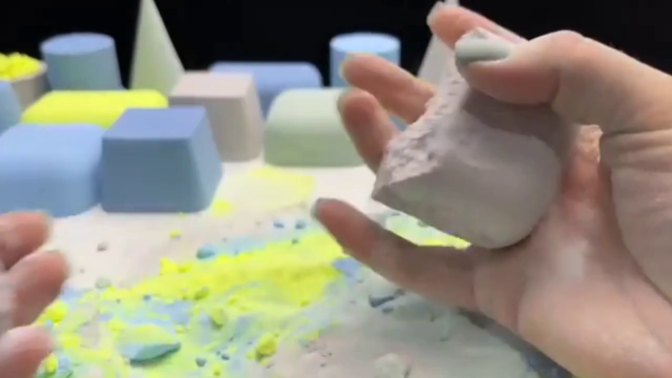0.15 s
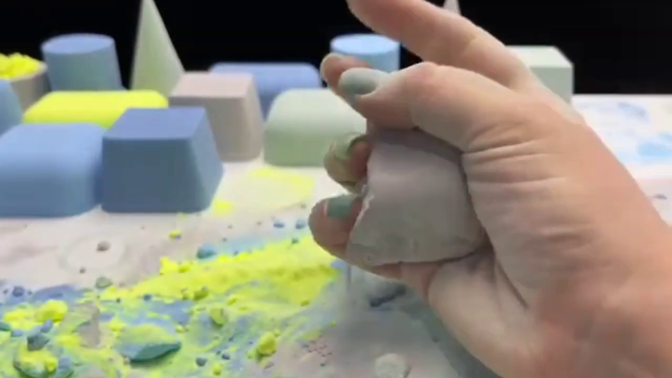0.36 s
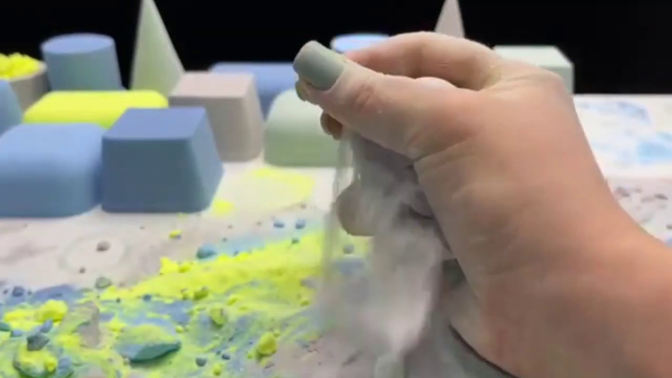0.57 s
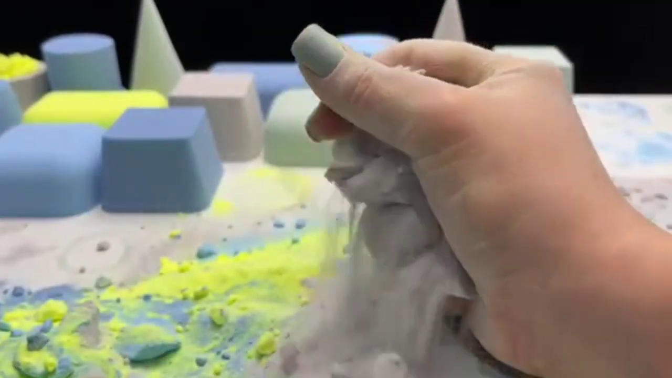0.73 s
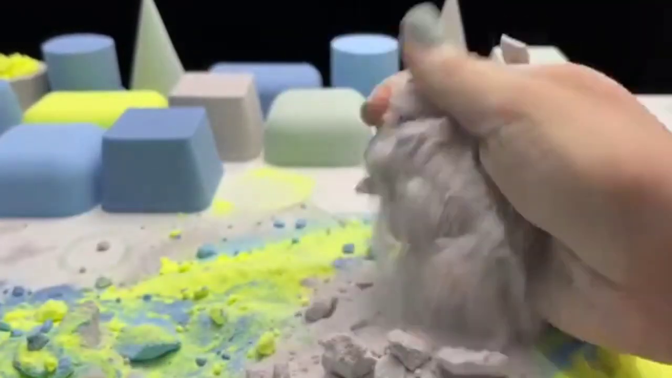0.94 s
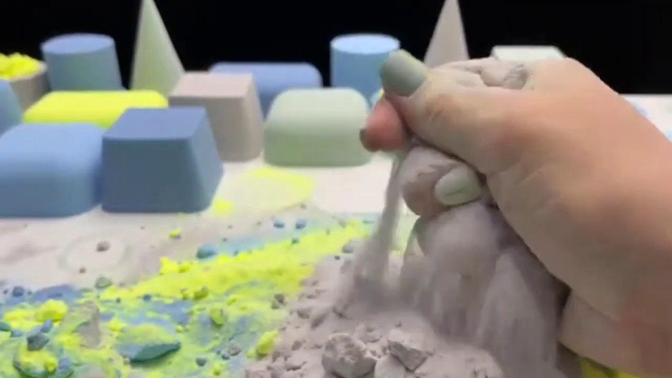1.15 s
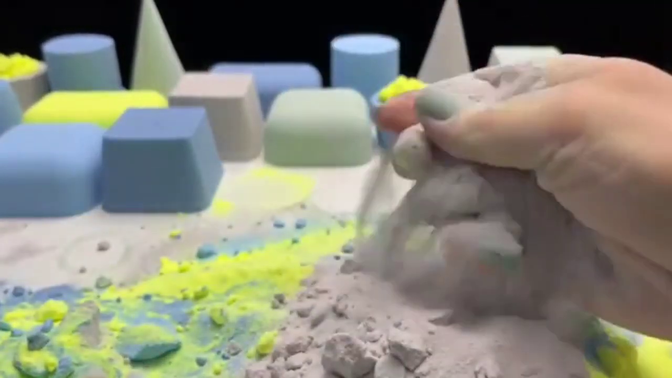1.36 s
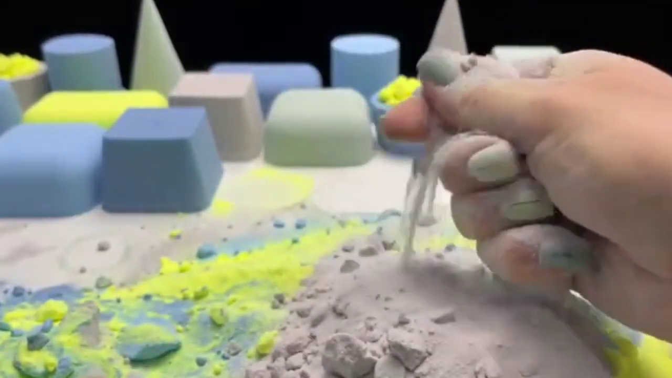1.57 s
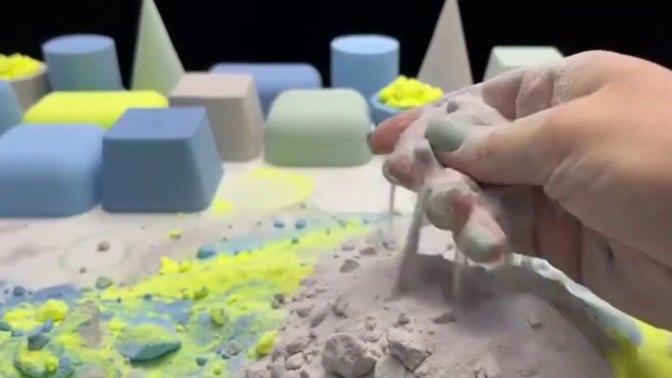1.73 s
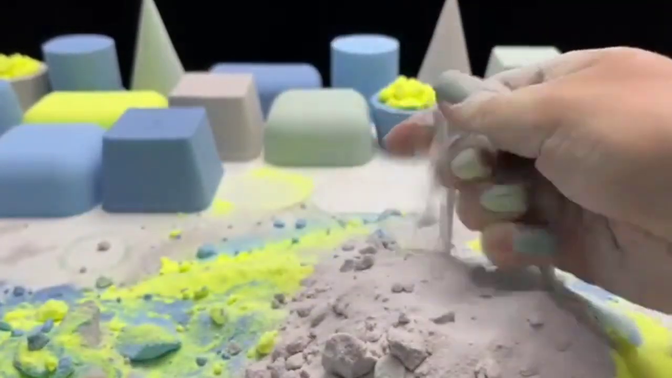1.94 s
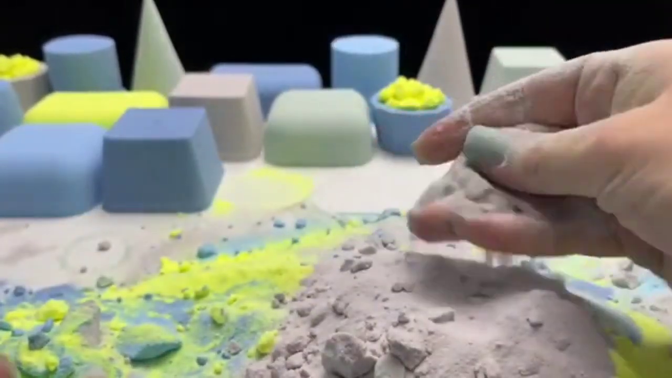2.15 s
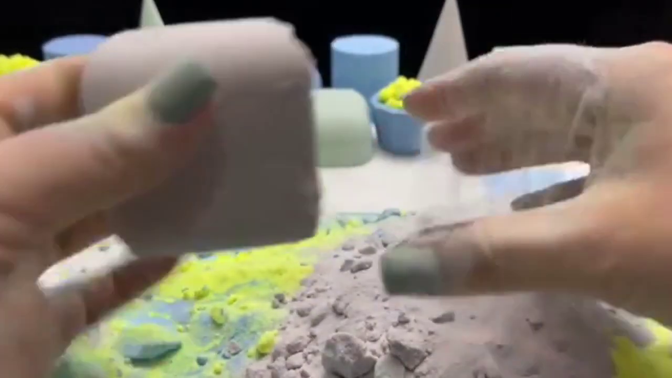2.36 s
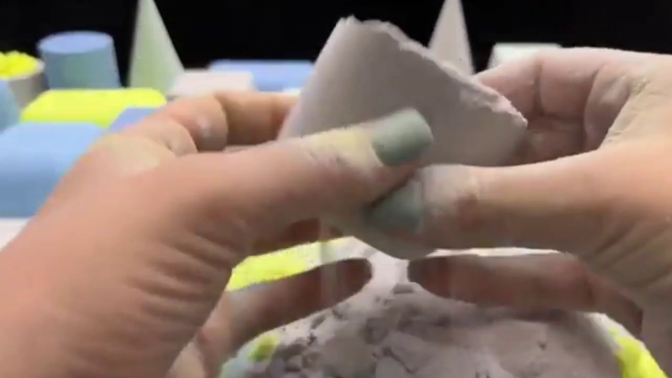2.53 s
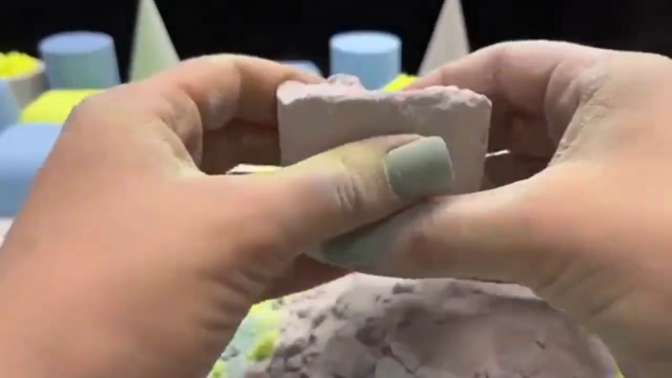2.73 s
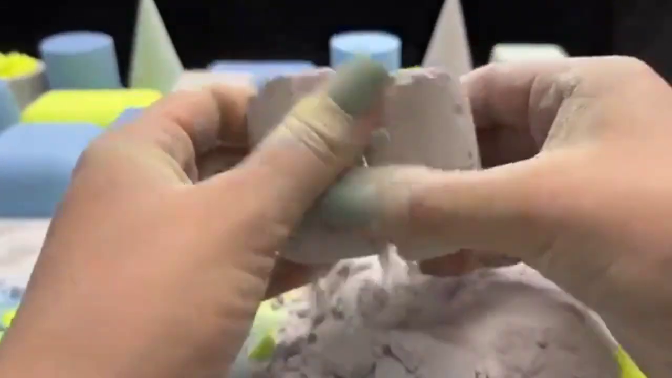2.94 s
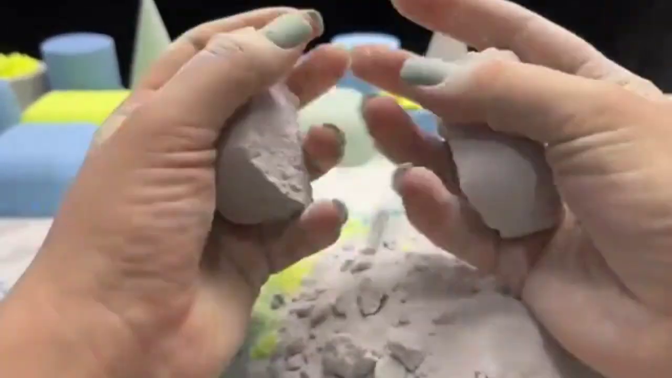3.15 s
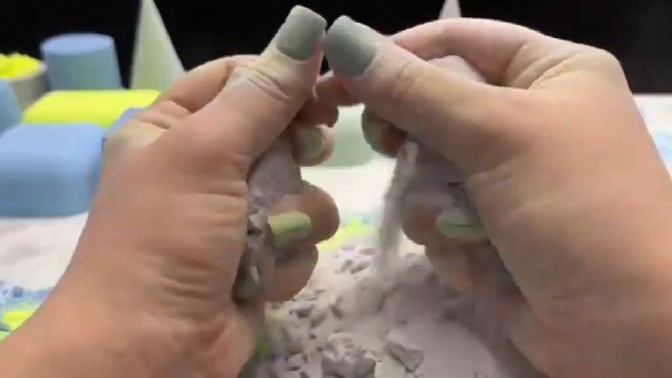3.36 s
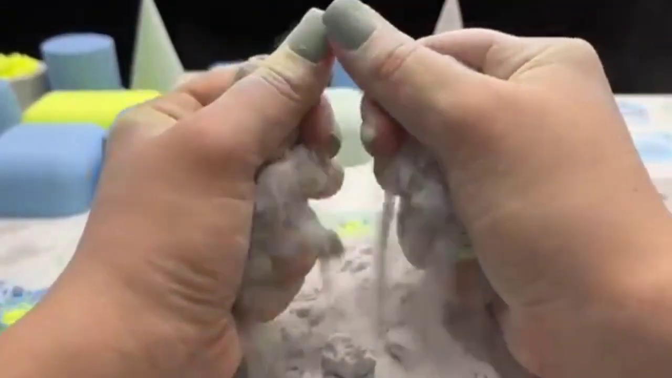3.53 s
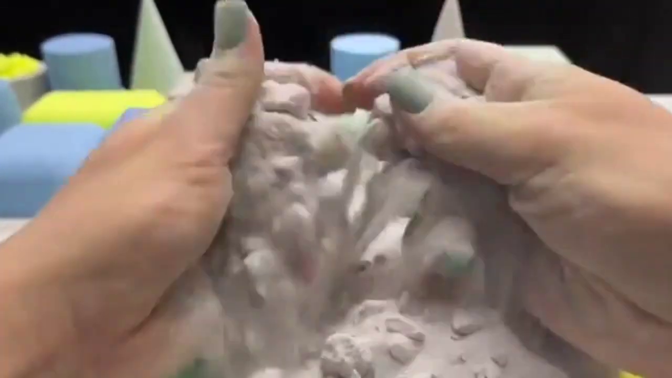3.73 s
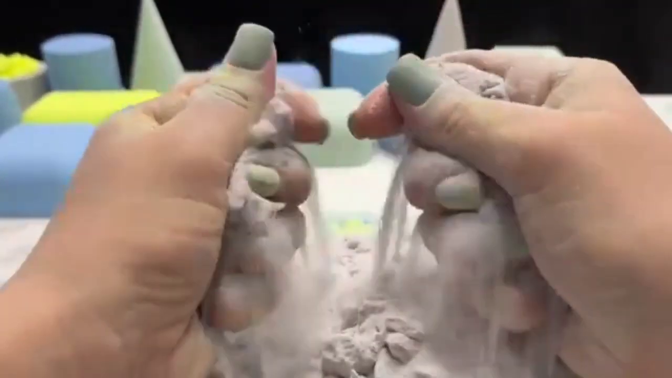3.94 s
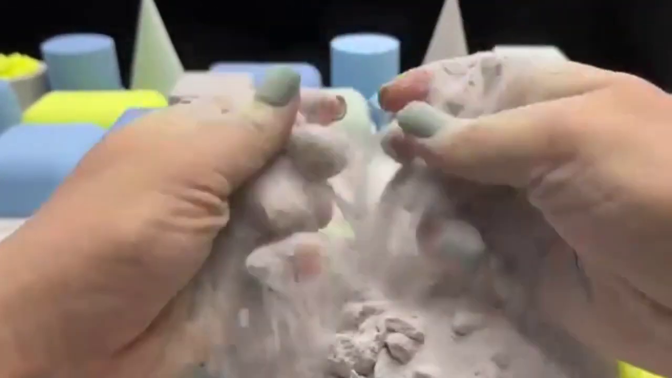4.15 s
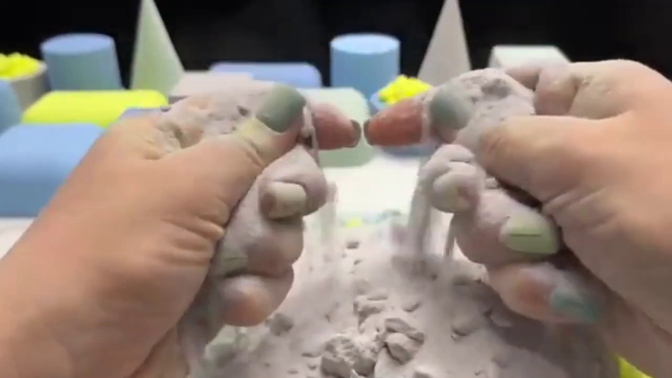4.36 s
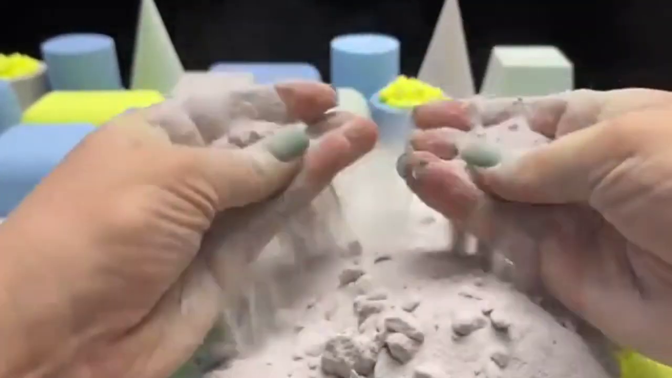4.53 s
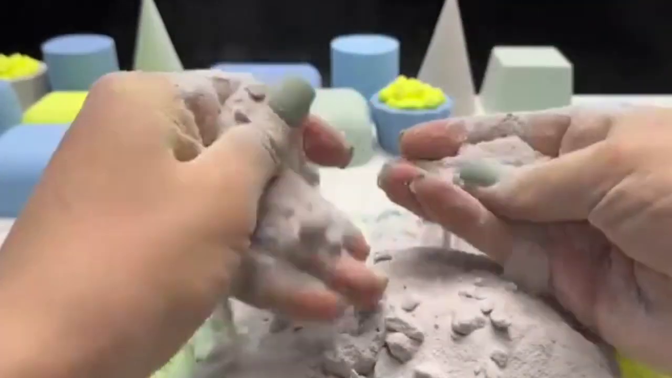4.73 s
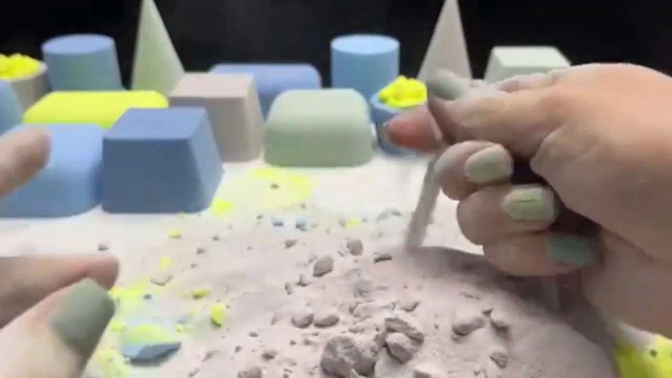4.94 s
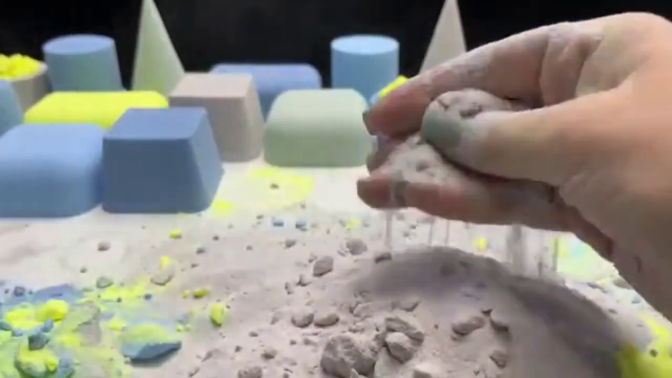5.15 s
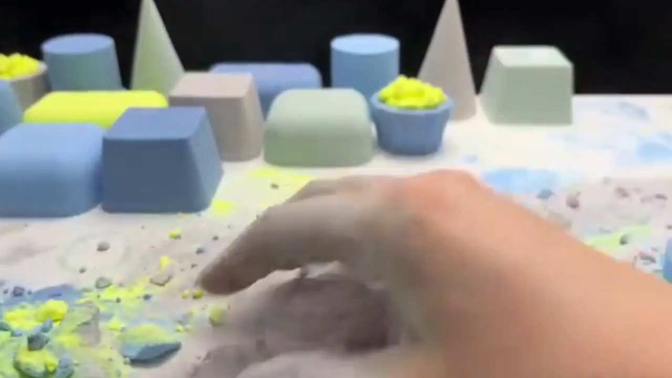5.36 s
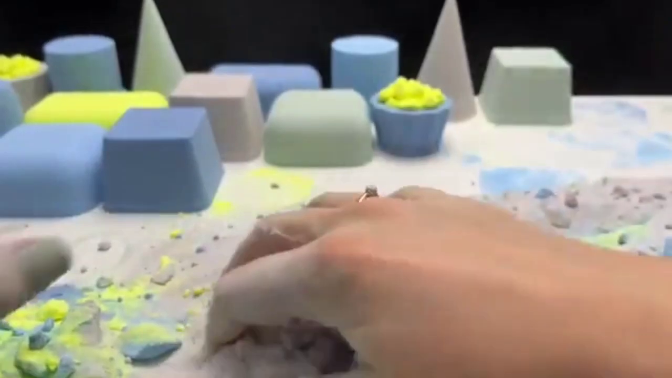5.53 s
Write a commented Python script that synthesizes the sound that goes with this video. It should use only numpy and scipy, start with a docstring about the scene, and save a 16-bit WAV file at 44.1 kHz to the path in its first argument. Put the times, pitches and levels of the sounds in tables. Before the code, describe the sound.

A close stereo microphone in a quiet room hears hands crushing pressed powder above a table. From 0 to 0.4 s, fine, dry hissing strokes rub the block. At about 0.45 s it breaks: a dense cluster of crunches, hollow knocks and dusty puffs, strongest from 0.5 to 0.85 s, with low table rumble. From 0.9 to 2.8 s it is softer, with sandy sifting, flickering finger rubs, and isolated ticks near 1.45, 1.8 and 2.2 s. A firm single crack lands at 2.86 s. Light rubbing leads to a second, longer crush from 3.3 to 4.3 s, full of rapid irregular snaps, crumbling and short thuds, peaking around 3.4 to 3.9 s. Smaller crumbles and gritty trickles follow until 5.3 s, with a small crunch near 4.9 s. From 5.45 s to the end at about 5.7 s, a palm slides over loose powder with a smooth, broad rushing rub.

```python
"""Hands crush blocks of pressed powder: lumps crack and thud as filtered impulses, with puffs of noisy dust,
and the table top carries each blow as a falling chirp. Squeezes crumble as streams of tiny impacts;
strokes rub with a dry, flickering hiss of dense grains, and last a palm slides over the heap.
Below lies a low rumble of the table and the quiet room. A two-port microphone close by hears it all."""
import sys
import numpy as np
from scipy import signal
from scipy.fft import rfft, irfft, next_fast_len
from scipy.io import wavfile
from scipy.ndimage import uniform_filter1d, map_coordinates

SR = 44100
rng = np.random.default_rng(int(sys.argv[2]) if len(sys.argv) > 2 else 0)


def digitize_waveform(pressure):
    """Quantize a signal to 16-bit integers and store it at the path in sys.argv[1].

    Rows of a 2-D input are taken as channels; values are limited to [-1, 1].
    """
    field = np.atleast_2d(pressure).T
    bounded = np.clip(field, -1, 1)
    quanta = np.round(bounded * 32767).astype(np.int16)
    wavfile.write(sys.argv[1], SR, quanta)


def voltage_ratio(decibels):
    """Convert decibels (scalar or array-like) to amplitude ratios, 20 dB per decade."""
    exponent = np.asarray(decibels, float) / 20
    return 10 ** exponent


N = 250929  # length in samples


def unit(x):
    """Normalisation: scale to rms 1."""
    return x / np.sqrt(np.mean(x ** 2) + 1e-20)


def along(points, hz):
    """Logarithmic pitch: columns of (Hz, value, ..) rows are interpolated on a log frequency axis."""
    f, *cols = np.transpose(points)
    return np.squeeze([np.interp(np.log(hz + 1), np.log(f + 1), c) for c in cols])


def curves(rows):
    """Linear envelopes: one value per sample for each column after the time."""
    s, *cols = np.transpose(rows)
    return [np.interp(np.arange(N) / SR, s, c) for c in cols]


def wobble(rate):
    """Slow modulation: a smooth random curve through rate knots a second."""
    return map_coordinates(rng.standard_normal(N // 20), [np.arange(N) * rate / SR])


def filtered(x, response):
    """Linear filtering: the spectrum of x times a complex response of frequency."""
    m = next_fast_len(N + SR // 2)
    return irfft(rfft(x, m) * response(np.fft.rfftfreq(m, 1 / SR)), m)[..., :N]


def grains(spectrum, rate, spread_db, smooth):
    """Shot noise: two unrelated streams of uneven tiny impacts over smooth noise, coloured, rms 1."""
    hit = rng.random(N) < rate / SR
    size = unit(hit * voltage_ratio(spread_db * np.minimum(rng.exponential(size=N), 3)))
    stream = (size + smooth) * rng.standard_normal((2, N))
    return unit(filtered(stream, lambda hz: voltage_ratio(along(spectrum, hz))))


def bursts(rows, rise_s, fall_s, arch_db, floor_db, extra=0):
    """Power addition: level in dB of tilted, arched bursts with quick edges, over a floor.

    Each row: start in seconds, length in seconds, level in dB, swell in dB, extra dB (weighted by extra).
    """
    edge_db = 4.5  # loss over one rise or fall time
    start, length, db, swell_db, extra_db = np.transpose(rows)[:, :, None]
    grid = np.arange(0, N + 64, 64)
    t = grid / SR - start
    u = np.clip(t / length, 0, 1) - .5  # -0.5 at the start, 0.5 at the end
    edges = np.maximum(1 - t / rise_s, 0) + np.maximum(1 - (length - t) / fall_s, 0)
    middle_db = db + extra * extra_db + swell_db * u - arch_db * (2 * u) ** 2
    gains = voltage_ratio(middle_db - edge_db * edges)
    level_db = 10 * np.log10(np.sum(gains ** 2, axis=0) + voltage_ratio(floor_db) ** 2)
    return np.interp(np.arange(N), grid, level_db)


# Stereo image of the two ports, by frequency, with flat stretches of opposite or equal phase.
# Each row: frequency in Hz, left phase lead in rad, likeness 0-1, left-right level in dB;
# lead and level are split by the weights of the two ports.
PORT_PAIR = [(60, 0, .91, -.7), (400, .16, .87, .1), (900, .6, .68, 1.6), (1300, .9, .1, 2.1),
             (1600, .4, 0.05, 1.1), (1850, .1, .93, .5), (2500, .5, .65, .6), (3400, .9, .45, 2.5),
             (4800, .05, .6, 2.5), (6400, -.9, .5, 2.2), (7300, -2.2, .65, .6), (7620, -np.pi, 1, 0),
             (8900, -np.pi, 1, 0), (9200, -4, .55, 0), (10600, -5.6, .6, 0), (11200, -2 * np.pi, 1, 0),
             (12800, -2 * np.pi, 1, 0), (13200, -7, .55, 0), (14300, -8.5, .6, 0),
             (14600, -3 * np.pi, 1, 0)]


def ports(pairs):
    """Partial coherence: each port hears a shared and an unshared stream, turned and shaded by frequency."""
    def hear(sign):
        def response(hz):
            lead, alike, shade_db = along(PORT_PAIR, hz)
            turn = np.arccos(np.clip(alike, 0, 1)) / 2
            mix = [np.cos(turn), 1j * sign * np.sin(turn)]
            return voltage_ratio(sign * shade_db / 2) * np.exp(sign * .5j * lead) * mix
        return response
    left = filtered(pairs[0], hear(0.817)).sum(axis=0)
    right = filtered(pairs[1], hear(-1.068)).sum(axis=0)
    return np.array([left, right])


# Quiet room noise. Each row: frequency in Hz, relative level in dB per Hz.
ROOM_SPECTRUM = [(15, -25), (35, -17), (65, 7.5), (110, -6), (300, -43)]


def room():
    """Ambient noise: a low, nearly steady murmur of the room."""
    return voltage_ratio(-54.5 + 0.96 * wobble(4.04)) * grains(ROOM_SPECTRUM, rate=230, spread_db=14.0, smooth=8.9)


# Squeezes and spills of the heap in the fist. Each row: start in seconds, length in seconds,
# crumble level in dB, swell from start to end in dB, table rumble over crumble in dB before its weight.
FIST_SQUEEZES = [(.22, 0.31, -66, 3, 14), (.455, .075, -43, -7, 1.5), (.53, .15, -29.5, 0, 2),
                 (.68, .19, -35.5, -1.5, -4), (.87, .17, -48, 5, -18), (1.04, 0.073, -41.5, -2, 2),
                 (1.11, 0.069, -34.5, -2, -8), (1.18, .1, -47.5, -2, 3), (1.4, 0.27, -49.5, -15, 5.5),
                 (1.81, 0.14, -50.5, -13, 5), (2.17, 0.15, -65, -1, 13), (2.86, 0.16, -60, 4, 12),
                 (3.31, 0.26, -32, 10.5, -3), (3.55, 0.069, -38, 1, 8), (3.6, 0.081, -33.5, -3, 5),
                 (3.67, 0.19, -45, 2, -8), (3.79, .2, -29.5, 2, -3.5), (3.98, 0.11, -37, 0, 1),
                 (4.07, 0.17, -46, -2, -3), (4.21, 0.36, -44.5, -22.5, 0), (4.55, .17, -43, 4, -4),
                 (4.72, 0.17, -50, 10, -17), (4.87, 0.094, -47.5, -8, 5.5), (5.02, 0.38, -63.5, 2, 12.5),
                 (5.48, 0.22, -51, -10, 5)]


def squeeze_db(floor_db, rumble_weight=0):
    """Level envelope: the squeezes in dB over a floor, as crumble (0) or towards rumble (1)."""
    return bursts(FIST_SQUEEZES, rise_s=.02, fall_s=0.029, arch_db=6.5, floor_db=floor_db, extra=rumble_weight)


# The pressed table. Each row: frequency in Hz, relative level in dB per Hz.
RUMBLE_SPECTRUM = [(20, -33), (45, -2), (100, -1.5), (150, -9.5), (250, -21), (600, -29)]


def rumble():
    """Forced vibration: the table rumbles low under the pressing hands."""
    level_db = squeeze_db(floor_db=-58, rumble_weight=0.96) + 0.9 * wobble(7.1)
    return voltage_ratio(level_db) * grains(RUMBLE_SPECTRUM, rate=90, spread_db=-9.0, smooth=2.04)


# A palm slides over the heap. Each row: time in seconds, level in dB.
PALM_LEVEL = [(5.44, -63), (5.48, -43), (5.56, -38.5), (5.69, -42.5)]
# Skin on loose powder. Each row: frequency in Hz, relative level in dB per Hz.
SLIDE_SPECTRUM = [(120, -30), (300, -7), (900, 1), (2000, -6), (3500, -2.5), (6000, -18)]


def sweep():
    """Sliding friction: skin on loose powder gives an even, broad rush."""
    on = np.arange(N) > PALM_LEVEL[0][0] * SR
    level_db = curves(PALM_LEVEL)[0] + 1.7 * wobble(30)
    return on * voltage_ratio(level_db) * grains(SLIDE_SPECTRUM, rate=2000, spread_db=-3.0, smooth=5)


LOOSE_DB = -62  # crumble between squeezes


def grip_db():
    """Level difference: how far the squeezes lift the crumble over its loose level."""
    return squeeze_db(LOOSE_DB) - LOOSE_DB


def crushing():
    """Fracture under load: how hard the grip breaks lumps, 0-1; nothing breaks once the palm slides."""
    full_crush_db = 22  # a squeeze this far over the loose crumble only breaks lumps
    return np.clip(grip_db() / full_crush_db, 0, 1) * (np.arange(N) < PALM_LEVEL[0][0] * SR)


# Finger strokes through the powder. Each row: start in seconds, length in seconds, sheen level in dB,
# swell from start to end in dB, hiss over sheen in dB.
FINGER_STROKES = [(-.05, 0.071, -41.5, 1, 3), (.025, 0.058, -48, 4, -1), (.07, 0.063, -35, -0.5, -3),
                  (0.137, 0.1, -36.5, -4, -4), (0.254, 0.094, -38, 1, -4.5), (.345, .1, -37, -4, -3.5),
                  (.443, 0.067, -36.5, -8, -3.5), (0.509, 0.2, -37, 0, -1), (.69, 0.22, -40, -6, -0.5),
                  (0.873, 0.15, -47, 1, 0.5), (1.012, 0.28, -40.5, 1, -0.5), (1.275, 0.19, -50, -4, 3),
                  (1.428, 0.16, -43.5, 4, -2.5), (1.57, 0.099, -43.5, -7, -0.5),
                  (1.69, 0.17, -52, -9.5, -0.5), (1.807, 0.14, -44, 1, -2), (1.937, 0.064, -45, 0, -2.5),
                  (1.99, 0.19, -47, 10, -3), (2.156, 0.072, -45, 1, -3), (2.233, 0.096, -41.5, 1.5, -1.5),
                  (2.389, 0.017, -44.5, 5, -6), (2.439, 0.16, -40, 7, -0.5),
                  (2.641, 0.14, -42.5, 4.5, -0.5), (2.79, 0.026, -46, 2, -6.5),
                  (2.855, 0.022, -36.5, 13, -4.5), (2.9, 0.03, -60, 0, -9), (2.935, 0.052, -37.5, 4, -2.5),
                  (3.025, .12, -38.5, 0.5, -1.5), (3.14, 0.055, -49, -7, -3.5), (3.197, 0.38, -36, 6.5, 1),
                  (3.615, 0.072, -38.5, -5, 3), (3.67, 0.18, -49, -7, 4), (3.793, 0.29, -36, 0, 3),
                  (4.06, 0.18, -42.5, -3, 2), (4.198, 0.15, -43.5, 4, 5), (4.29, .2, -39, -4, 0.5),
                  (4.48, 0.06, -46, 3, -4.5), (4.53, 0.11, -46.5, -6, 3.5), (4.61, 0.13, -47.5, 2, 3),
                  (4.719, 0.063, -42.5, 5, 4), (4.775, 0.048, -39.5, -3, -1.5), (4.806, 0.13, -49, -4, 1),
                  (4.915, 0.085, -42.5, -4, -3.5), (4.987, 0.2, -54.5, -10, -3), (5.098, 0.14, -46, 9, 0),
                  (5.245, 0.075, -43, -8, 2.5), (5.444, 0.61, -57, -20, 6)]


def stroke_db(hiss):
    """Level envelope: the strokes' sheen (0) or hiss (1) in dB, over near silence."""
    return bursts(FINGER_STROKES, rise_s=0.011, fall_s=0.007, arch_db=5.5, floor_db=-79, extra=hiss)


def patchy(x, depth_db):
    """Time-varying colour: short narrow bands come and go as the gaps between the fingers open and close."""
    _, frame, z = signal.stft(x, nperseg=512)
    field = uniform_filter1d(rng.standard_normal(z.shape[1:]), size=2, axis=0)
    field = uniform_filter1d(field, size=14, axis=1)
    depth_db = depth_db[np.minimum(frame.astype(int), N - 1)]
    gain = voltage_ratio(depth_db * unit(field))
    gain = gain / np.sqrt(np.mean(gain ** 2, axis=0))
    return signal.istft(z * gain, nperseg=512)[1][:, :N]


# Dry hiss of powder. Each row: frequency in Hz, relative level in dB per Hz.
HISS_SPECTRUM = [(1700, -21.5), (2900, -2), (4000, 0.5), (6500, 0.5), (8000, 3), (10000, -18)]
# Finer, higher sheen of powder. Each row: frequency in Hz, relative level in dB per Hz.
SHEEN_SPECTRUM = [(6500, -33), (8500, -4), (11000, -4), (13500, -7), (14800, -8), (15250, -64)]


def rub():
    """Granular friction: sheared powder gives a flickering hiss and a finer sheen, patchier when rubbed lightly."""
    hard = crushing()
    hiss = patchy(grains(HISS_SPECTRUM, rate=2100, spread_db=4.0, smooth=3.3), 4.4 - 1.2 * hard)
    sheen = patchy(grains(SHEEN_SPECTRUM, rate=5000, spread_db=4.0, smooth=2.6), 2.2 - 0.63 * hard)
    flicker = voltage_ratio(0.51 * wobble(22.53) + 1.78 * wobble(70))
    return flicker * (voltage_ratio(stroke_db(1)) * hiss + voltage_ratio(stroke_db(0)) * sheen)


# Modes of the table top. Each row: frequency in Hz, width in Hz, level in dB before the common ring level.
TABLE_MODES = [(86, 22, -5), (162.5, 29, -3), (252.5, 19, 3), (366, 38, -4.5), (473, 78, -4.5),
               (656, 63, -5.5), (1390, 51, -19), (2010, 120, -3)]


def table(hz, cycles=1.508, ring_db=-2):
    """Dispersion: bending waves run faster at high pitch, so a blow is a falling chirp that rings the modes."""
    chirp = np.exp(-2j * np.pi * cycles * np.log(1 + hz / 90))
    modes = sum(voltage_ratio(db) * 1j * hz * w / (c * c - hz * hz + 1j * hz * w) for c, w, db in TABLE_MODES)
    return chirp * (1 + voltage_ratio(ring_db) * modes)


# How gritty the rubbed powder is. Each row: time in seconds, grit in dB over about the hiss level.
GRIT_LEVEL = [(0, -10.5), (.1, -13), (.2, -39), (.4, -11), (.55, 4.5), (1.2, -2.5), (1.5, -4.5), (1.9, -2),
              (2.05, -4), (2.25, -4), (2.5, -18.5), (2.75, -11.5), (3.15, -24), (3.4, -0.5), (4.3, -4),
              (4.5, -4.5), (4.8, -9.5), (4.87, 3), (4.97, 4), (5.05, -3), (5.17, 0), (5.28, -9.5),
              (5.4, -7), (5.69, 3)]
# Grit in the powder. Each row: frequency in Hz, relative level in dB per Hz.
GRIT_SPECTRUM = [(400, -13.5), (800, -14.5), (1300, -2), (2050, 0), (2800, -2.5), (4500, -8), (7000, -21.5)]
# Low part of a blow. Each row: frequency in Hz, relative level in dB per Hz.
THUD_SPECTRUM = [(40, -8), (120, -8), (280, -1.5), (550, -11), (1000, -64)]
# Middle part of a blow. Each row: frequency in Hz, relative level in dB per Hz.
KNOCK_SPECTRUM = [(250, -31), (480, -6), (800, -1), (1300, -9.5), (2500, -29.5)]


def crumble():
    """Superposed impacts: small lumps give way and tap the table; in a harder grip single breaks stand out."""
    breaks = grains(THUD_SPECTRUM, rate=220, spread_db=-5.0, smooth=0.034)
    breaks = breaks + voltage_ratio(1.0) * grains(KNOCK_SPECTRUM, rate=190, spread_db=0.5, smooth=0.33)
    sift = grains(THUD_SPECTRUM, rate=900, spread_db=6.0, smooth=1.2)
    sift = sift + voltage_ratio(-2) * grains(KNOCK_SPECTRUM, rate=490, spread_db=-5.0, smooth=3.2)
    share = crushing()
    lumps = share * unit(filtered(breaks, table)) + np.sqrt(1 - share ** 2) * unit(filtered(sift, table))
    lumps_gain = voltage_ratio(LOOSE_DB + grip_db() + 3.0 * wobble(28))
    # light sifting comes from one spot, so the two ports share more of it
    grit = grains(GRIT_SPECTRUM, rate=500, spread_db=3, smooth=2.2) * [np.ones(N), .4 + .8 * share]
    grit_gain = voltage_ratio(stroke_db(0.98) + curves(GRIT_LEVEL)[0] + 4.2 * wobble(35))
    return lumps_gain * lumps + grit_gain * grit


# Diffuse after-sound of table and room. Each row: frequency in Hz, time to fall by 60 dB in seconds.
AFTER_SOUND = [(100, 0.17), (300, 0.2), (800, 0.12), (2500, 0.18), (8000, 0.1)]


def linger(x):
    """Reverberant decay: each frequency of the after-sound dies at its own speed."""
    hz, t, z = signal.stft(rng.standard_normal(SR // 3), SR, nperseg=256)
    decay_db = -60 * t / along(AFTER_SOUND, hz)[:, None]
    tilt_db = -0.76 * np.log2(1 + hz / 400)[:, None]
    tail = signal.istft(z * voltage_ratio(decay_db + tilt_db), SR, nperseg=256)[1]
    return signal.fftconvolve(x, tail.reshape(1, 1, -1) / np.linalg.norm(tail), axes=-1)[..., :N]


# Cracks and falling lumps. Each row: time in seconds, knock level in dB, thud over knock in dB,
# snap over knock in dB, left-right level in dB.
LUMP_CRACKS = [(0.085, -60.5, 3, 28, -4), (.446, -10, -12, 1, 2.5), (.507, -22, -15, -10, 1),
               (0.535, -20, -11, -1, 9), (.543, -11, -20, -14, -1.5), (.586, -16.5, -1.5, 4.5, 5.5),
               (.606, -6, -14, -35, 5), (.646, -16.5, -9, -7, 6), (.664, -15, -6.5, -6, -7),
               (.707, -9.5, -27, -1, 4.5), (.768, -12, -8, -14, -1), (0.774, -2.5, -15, -24, -1.5),
               (0.829, -13, -8, -15, 0.5), (.894, -29.5, -1.5, -19, 0), (1.065, -33.5, -15, 5.5, -2),
               (1.088, -28.5, -2, -1, -4), (1.136, -26, 4, -12, -2), (1.266, -29, -9, -16, -2),
               (1.429, -38, 0, -5, -6), (1.446, -35, -1, 0, 7), (1.465, -15, -9, -11.5, -4),
               (1.749, -30.5, -10, -4.5, 1), (1.8198, -20, -12, 13, 2), (1.8246, -14, -7.5, 5, -2),
               (1.956, -59.5, -11, 31.5, -1), (2.17, -12.5, -17.5, -5.5, -2), (2.57, -53, 5, -10, 2),
               (2.861, -5.5, -3.5, -13.5, 0), (3.308, -21.5, -23, -7, -6), (3.332, -23.5, -12, 6, 0.5),
               (3.394, -13.5, -4, -24, 0), (3.422, 0, -26, -15.5, 1), (3.431, -18, -8, -3, -5),
               (3.459, -9, -13.5, -9, 1), (3.476, -32, 0, 1, 0), (3.508, -12, -9.5, -6.5, 5),
               (3.521, -9, -14.5, -16, -2), (3.563, -14, -20, -26, 13), (3.598, -9, -14, -9, 1),
               (3.63, -16.5, -11, 6.5, 4), (3.797, -13.5, -19, 0.5, 5.5), (3.815, -18, -12, -27, -5),
               (3.86, -14.5, -1, -4, 2), (3.888, -14, -12, -11, 3), (3.932, -20, 0, 2, 1),
               (3.943, -16.5, -3, 4, -3.5), (3.957, -13.5, -33, -6, 4), (3.967, -8.5, -15, -28, 5),
               (4.041, -21, -9, -8, 5), (4.209, -21, -10, -7, 2), (4.234, -10, -12, -12, -1),
               (4.255, -6, -8, -10, 2.5), (4.279, -24, 1, 6, 0), (4.623, -35.5, 4.5, -13, 6),
               (4.649, -34, 9.5, -10, -3), (4.67, -25.5, -14, -6, 11), (4.888, -19.5, -13.5, -4.5, -1.5),
               (4.913, -41, 0, 10, 2), (5.186, -36.5, -12, -6, -4)]
# Bright part of a blow. Each row: frequency in Hz, relative level in dB per Hz.
SNAP_SPECTRUM = [(700, -12), (1300, 8.5), (2300, 12.5), (4000, -9), (9000, 0), (15200, -81)]


def cracks():
    """Impulse excitation: a first break and sparse after-breaks drive thud, knock and snap, with a puff of dust."""
    travel_s = .00046  # delay to the ports
    after_t60_s, dust_t60_s = 0.033, 0.037
    dust_db, dust_per_snap = -19, 0.61  # puff over the knock; dB added per dB of snap
    blows = np.zeros((3, 2, 2, N + SR))  # part, port, shared or unshared stream, sample
    puffs = np.zeros(N + SR)
    t = np.arange(SR // 20) / SR
    for s, db, thud_db, snap_db, pan_db in LUMP_CRACKS:
        side = voltage_ratio([pan_db / 2, -pan_db / 2])[:, None, None]
        sparse = rng.random(len(t)) < .012
        breaks = 0.48 * voltage_ratio(-60 * t / after_t60_s) * rng.standard_normal((2, len(t))) * sparse
        breaks[:, 0] = 1, rng.choice([-1, 1])  # the first break
        part = voltage_ratio(db + np.array([thud_db, 0, snap_db]))[:, None, None, None]
        start = round((s + travel_s) * SR)
        blows[..., start:][..., :len(t)] += part * side * breaks
        puffs[start:][:len(t)] += voltage_ratio(db + dust_per_snap * snap_db + dust_db - 60 * t / dust_t60_s)

    def shape(spectrum):
        def response(hz):
            colour = voltage_ratio(along(spectrum, hz))
            return table(hz) * colour / np.mean(colour)
        return response

    spectra = (THUD_SPECTRUM, KNOCK_SPECTRUM, SNAP_SPECTRUM)
    body = sum(filtered(b[..., :N], shape(p)) for b, p in zip(blows, spectra))
    dust = grains(HISS_SPECTRUM, rate=19000, spread_db=24, smooth=1.0)
    dust = dust + 0.53 * grains(SHEEN_SPECTRUM, rate=5800, spread_db=5, smooth=2.8)
    return body + voltage_ratio(-10) * linger(body) + puffs[:N] * dust


def scene():
    """Superposition: all sources add up before the two ports hear them."""
    return ports(room() + rumble() + sweep() + rub() + crumble() + cracks())


def top_cut(x):
    """Nothing passes above the cut-off."""
    return signal.sosfilt(signal.butter(12, 15820, fs=SR, output="sos"), x)


def record(dry):
    """Signal chain: the two port signals are the finished mix and pass on unaltered to the last stage."""
    return top_cut(dry)


dry = scene()
out = record(dry)
digitize_waveform(out)
```